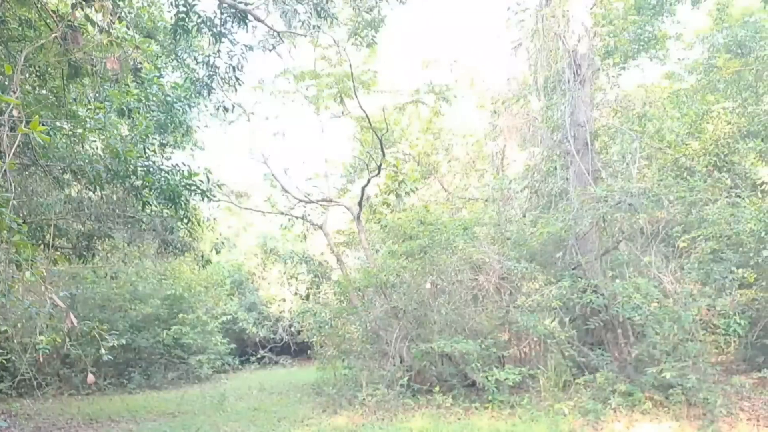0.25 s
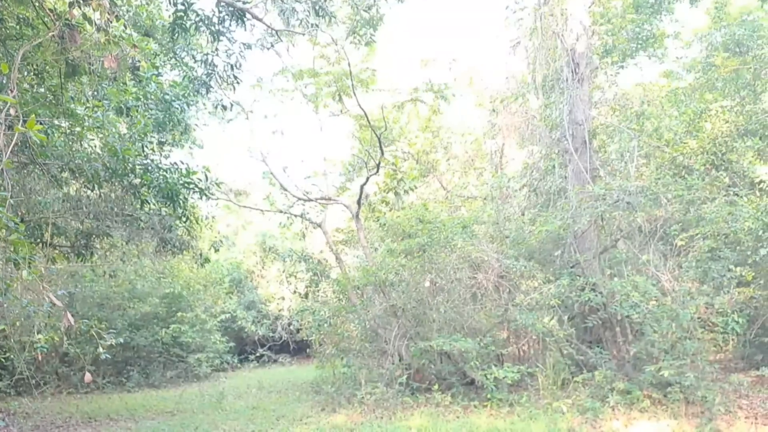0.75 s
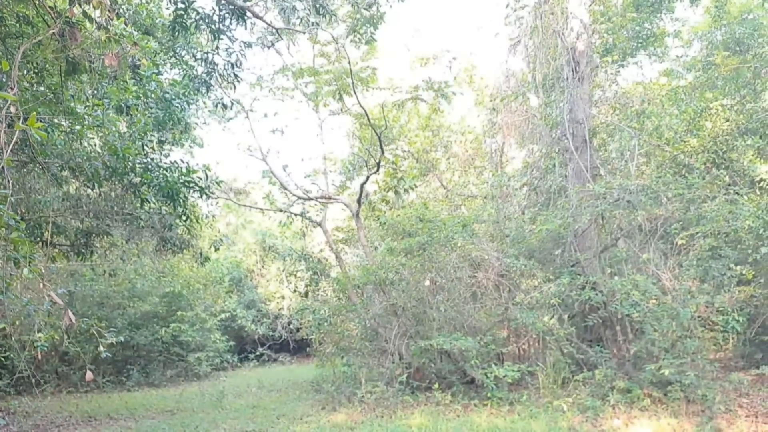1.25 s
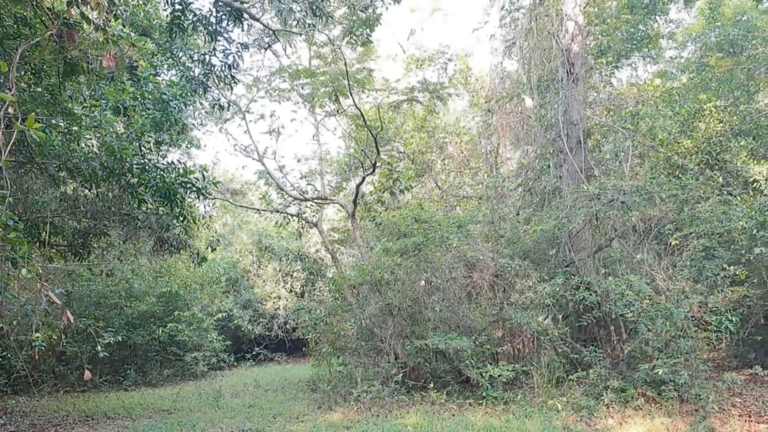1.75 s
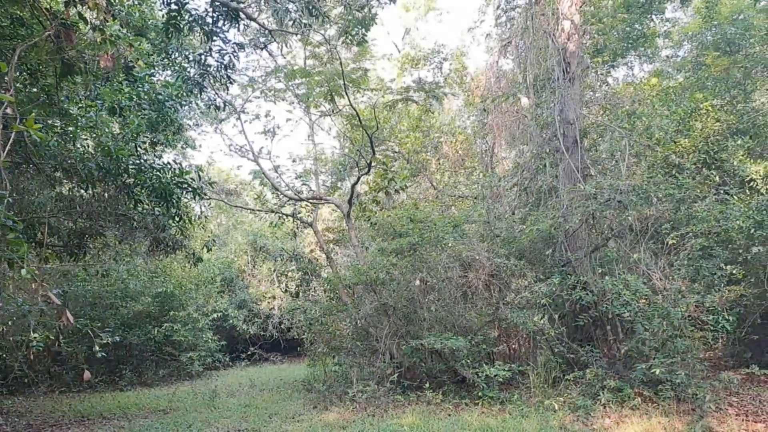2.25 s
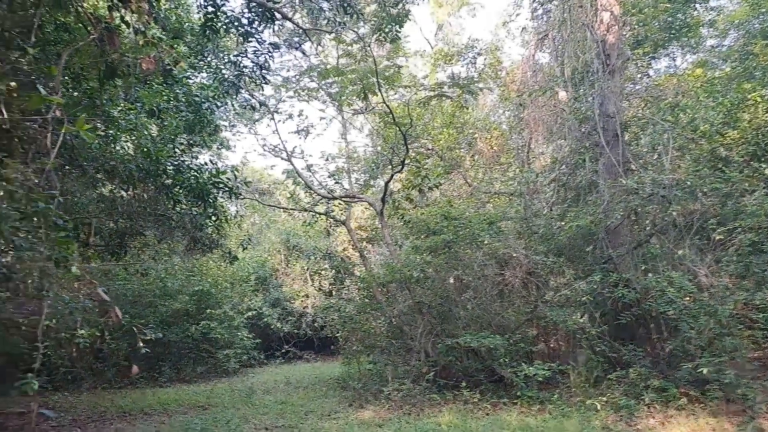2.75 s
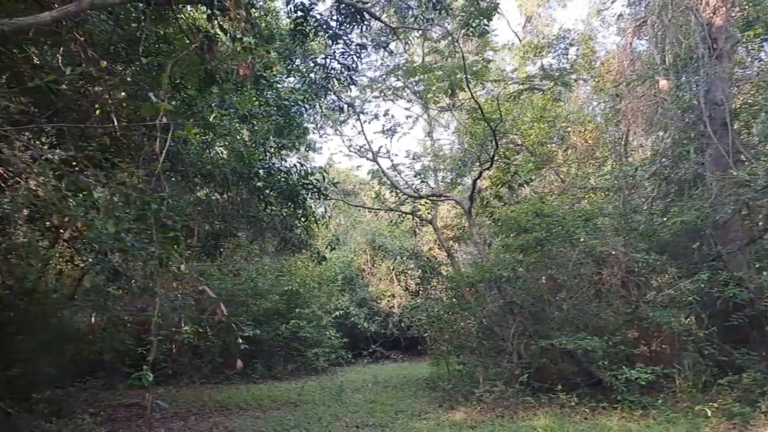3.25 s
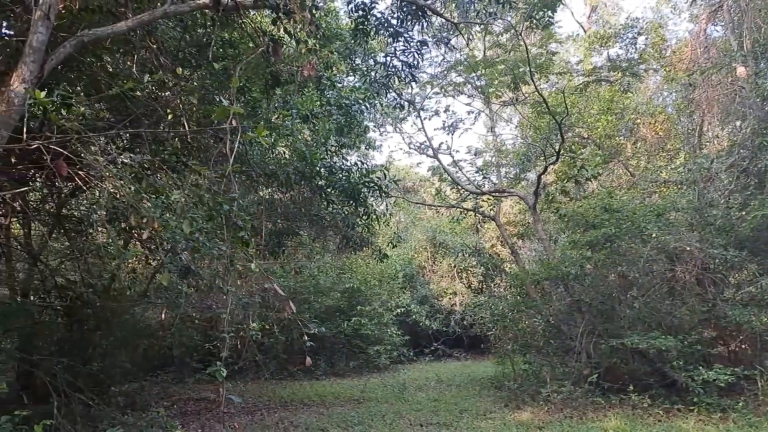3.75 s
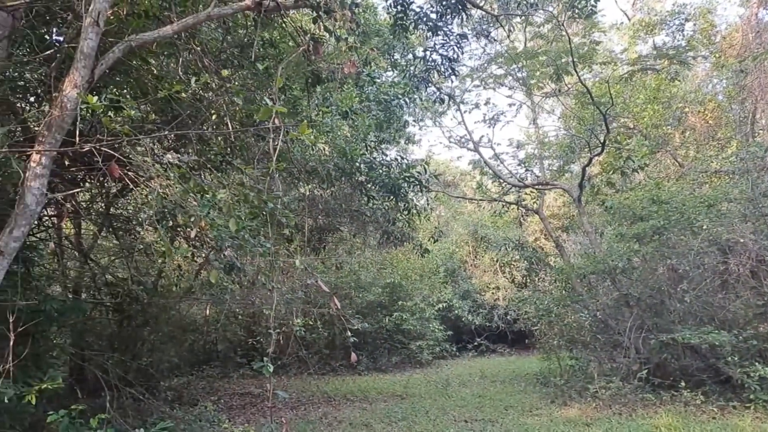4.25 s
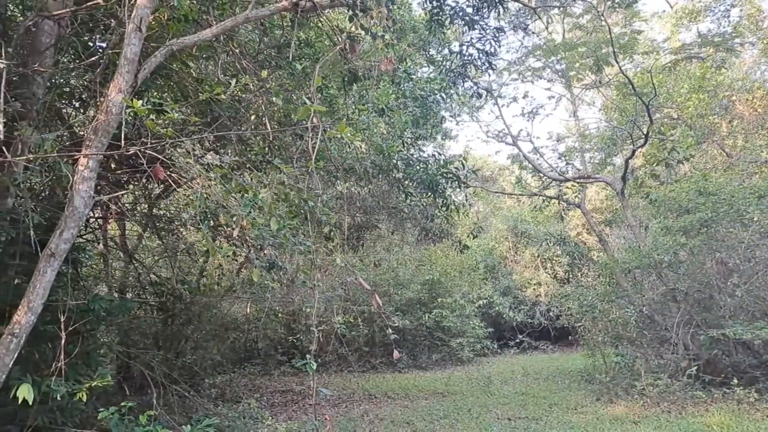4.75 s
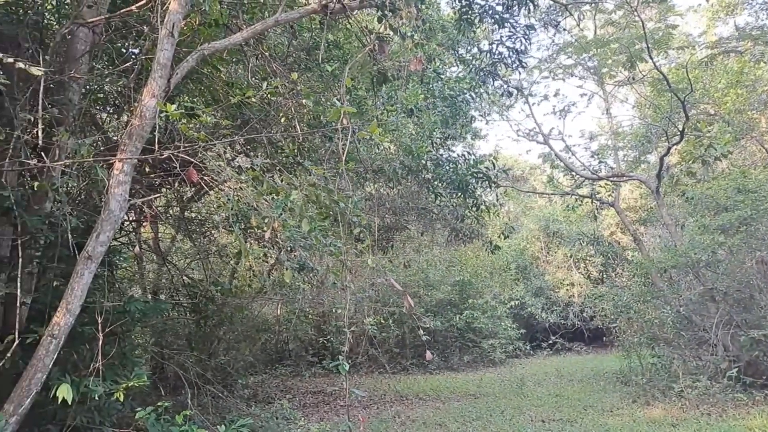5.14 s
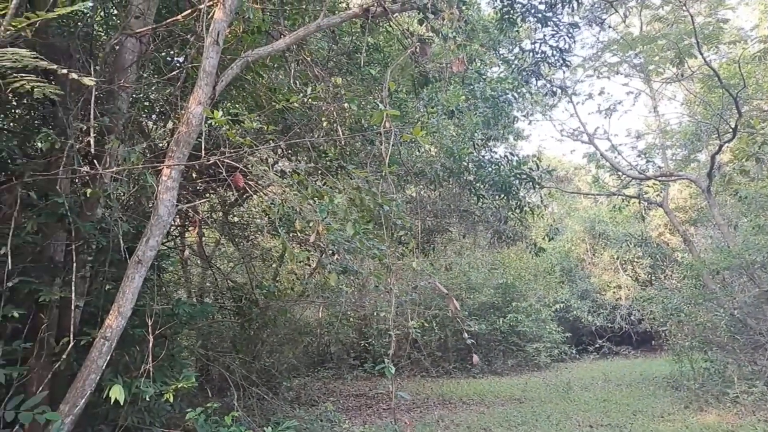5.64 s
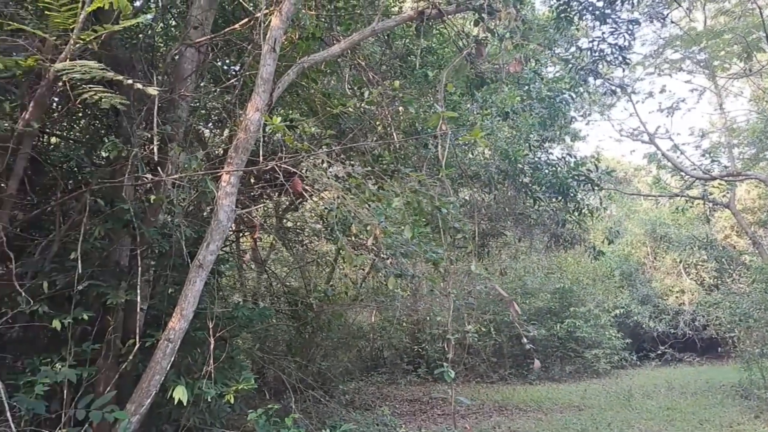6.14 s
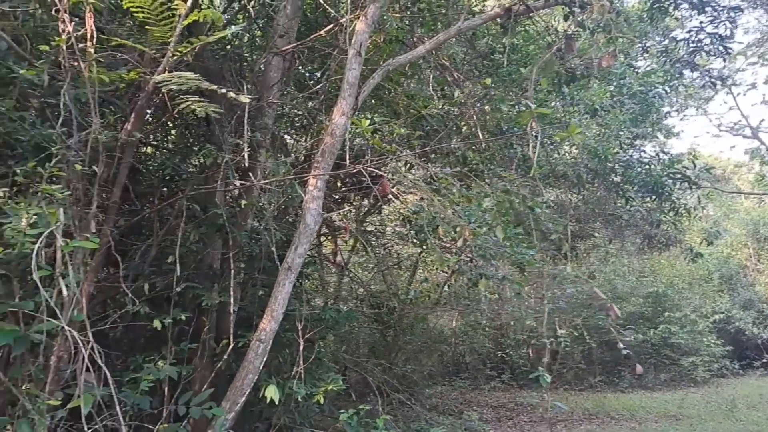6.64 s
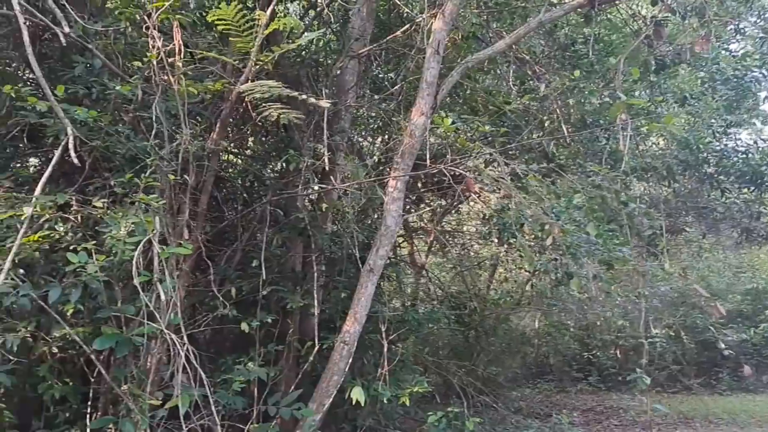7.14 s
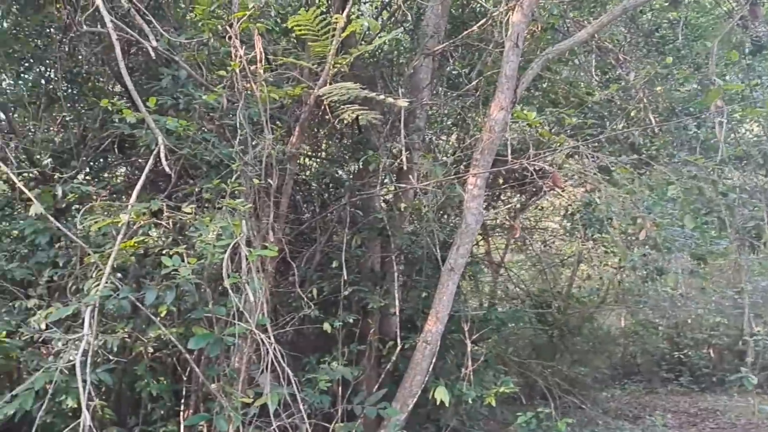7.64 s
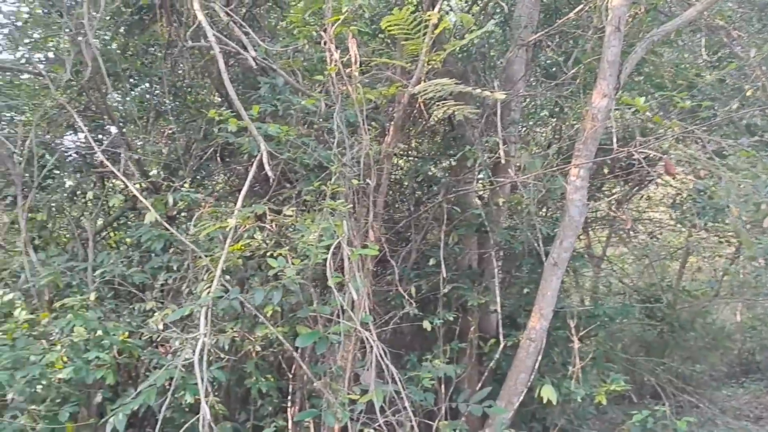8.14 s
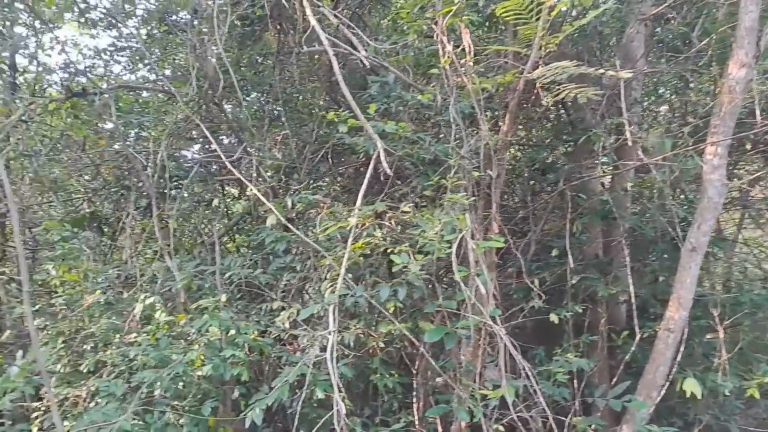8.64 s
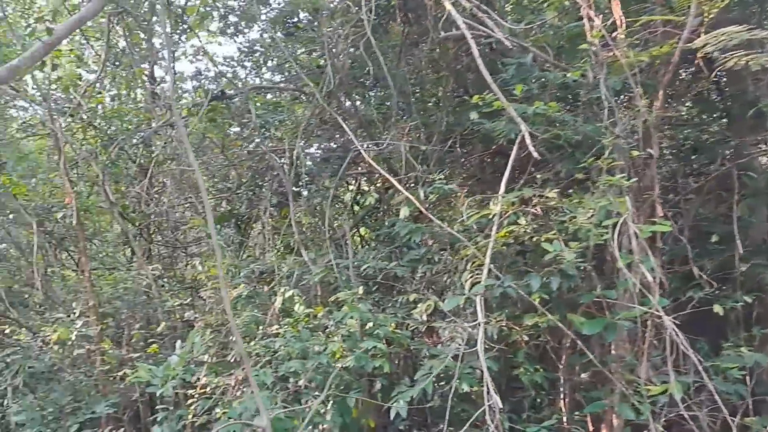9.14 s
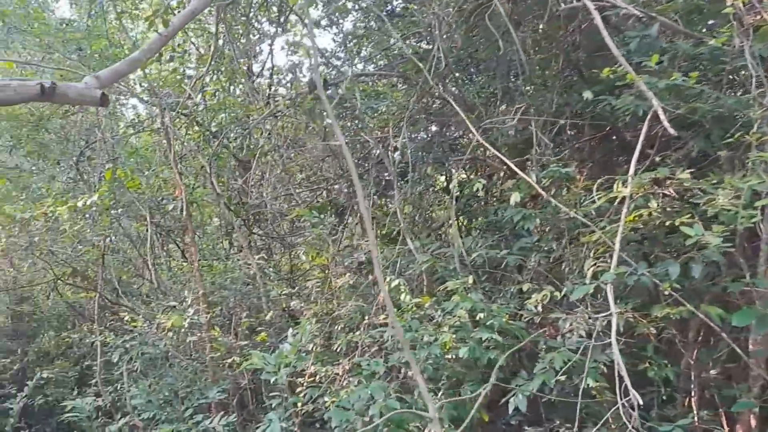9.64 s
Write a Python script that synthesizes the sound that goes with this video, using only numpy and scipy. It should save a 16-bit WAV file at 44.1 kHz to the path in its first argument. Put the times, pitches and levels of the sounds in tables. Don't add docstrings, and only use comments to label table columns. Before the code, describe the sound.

In a forest clearing, a wren sings bunches of quick four-note phrases, mostly in the first four seconds and again near six. Sharp high chips, faint trills and slurs answer around it, and a hoarse crow caws far off. Thin, steady insect ringing and low road rumble lie underneath. Leaves rustle lightly, then a loud twig snap and heavier steps come close to the stereo microphones after eight seconds.

```python
import sys
import numpy as np
from scipy import signal
from scipy.fft import rfft, irfft, next_fast_len
from scipy.io import wavfile
from scipy.ndimage import uniform_filter1d

SR = 44100
rng = np.random.default_rng(int(sys.argv[2]) if len(sys.argv) > 2 else 0)


def store_wav(level_fs):
    pcm = np.round(np.clip(np.atleast_2d(level_fs), -1, 1) * 32767)
    wavfile.write(sys.argv[1], SR, pcm.T.astype(np.int16))


def decibels_to_gain(level_db):
    exponent = np.asarray(level_db, float) / 20
    return 10 ** exponent


N = 436149
T = np.arange(N) / SR
SIZE = next_fast_len(N + SR)
HZ = np.arange(SIZE // 2 + 1) * SR / SIZE + 1e-3


def unit(x):
    return x / np.sqrt(np.mean(x ** 2))


def on_log(hz, table):
    f, v = np.transpose(table)
    return np.interp(np.log(hz), np.log(f), v)


def tint(x, gain):
    return irfft(rfft(x, SIZE) * gain, SIZE)[..., :N]


def bell(hz, octaves):
    return np.exp(-.5 * (np.log2(HZ / hz) / octaves) ** 2)


def walk(rate_hz):
    k = int(SR / rate_hz)
    held = np.repeat(rng.standard_normal(N // k + 1), k)
    return unit(uniform_filter1d(uniform_filter1d(held, k), k)[:N])


def sides(pan_db):
    return decibels_to_gain(np.array([[pan_db], [-pan_db]]) / 2)


def bouts(start_s, length_s, db, rest_db, rise_s, fall_s):
    coarse_t = T[::64]
    t = coarse_t - np.reshape(start_s, (-1, 1))
    overtime = np.maximum(t - np.reshape(length_s, (-1, 1)), 0)
    shape = np.exp(np.minimum(t, 0) / rise_s - overtime / fall_s)
    power = np.sum((decibels_to_gain(np.reshape(db, (-1, 1))) * shape) ** 2, axis=0)
    return np.interp(T, coarse_t, np.sqrt(decibels_to_gain(rest_db) ** 2 + power))


def arrive(lag_ms):
    return np.exp(-1j * np.pi * HZ * lag_ms / 1000 * np.array([[1], [-1]]))


def woods(x, direct_db, wet_db, t60_s, lag_ms):
    t = T[:SR]
    echo = rng.standard_normal((2, SR)) * decibels_to_gain(2.6 * rng.standard_normal((2, SR)))
    echo = echo * decibels_to_gain(-60 * t / t60_s) * np.clip(t / 0.012, 0, 1)
    echo = echo / np.sqrt(np.sum(echo ** 2, axis=1, keepdims=True))
    return tint(x, decibels_to_gain(direct_db) * arrive(lag_ms) + decibels_to_gain(wet_db) * rfft(echo, SIZE))


def whistle(out, rows, pan_db=0.):
    s, hz, db = np.transpose(rows)
    a, b = np.clip((s[[0, -1]] * SR).astype(int), 0, N)
    t = T[a:b]
    edge = np.clip(np.minimum(t - s[0], s[-1] - t) / 0.00044, 0, 1)
    phase = 2 * np.pi * np.cumsum(np.interp(t, s, hz)) / SR
    out[:, a:b] += sides(pan_db) * edge * decibels_to_gain(np.interp(t, s, db)) * np.sin(phase)


def falls(events, span, length_s):
    out = np.zeros((2, N))
    for s, db, hz, *pan_db in events:
        rows = [(s - .002, hz * (1 + span), db - 4.0),
                (s + 0.41 * length_s, hz * (1 + 0.11 * span), db),
                (s + length_s, hz * (1 - 0.6 * span), db - 8.5)]
        whistle(out, rows, *pan_db)
    return out


def air():
    # (frequency [Hz], level [dB per Hz])
    spectrum = [(20, -57), (38, -4), (56, 2.5), (85, 0), (146, -9), (350, -31), (900, -45.5), (1760, -43.5),
                (3400, -63), (4800, -40), (6500, -28), (9200, -43.5), (10700, -35), (16000, -61)]
    # (frequency [Hz], correlation [-1..1])
    likeness = [(60, 0.96), (130, 0.95), (290, 0.68), (640, 0.25), (1410, -0.26), (3100, 0.38),
                (6820, -0.084), (15000, -0.014)]
    # (time [s], level [dB])
    road = [(0.0, -29.5), (1.21, -28.5), (3.14, -31.5), (6.36, -30), (7.3, -32), (8.3, -30.5),
            (9.89, -30.5)]
    swell_db = walk(0.993)
    road_db = np.interp(T, *np.transpose(road)) + 30.5
    alike = np.clip(on_log(HZ, likeness), -.9, .99)
    noise = rfft(rng.standard_normal((2, SIZE))) * decibels_to_gain(on_log(HZ, spectrum))
    mid, side = noise * np.sqrt([1 + alike, 1 - alike])
    out = 0
    for hz in 28 * 2 ** np.arange(0, 9.6, .5):
        band = irfft(np.array([mid + side, mid - side]) * bell(hz, 0.38), SIZE)[:, :N]
        common_db = road_db if hz < 220 else swell_db
        out = out + band * decibels_to_gain(common_db + 1.64 * walk(6))
    return unit(out) * decibels_to_gain(-29.5)


def insects():
    # (pitch [Hz], band width [octaves], nearest singer's width [octaves], wing-stroke or
    # pulse rate [Hz], stroke sharpness, left minus right [dB])
    choirs = [
        (8165, 0.042, .002, 90.5, 2.0, 3.5),
        (7605, 0.03, .003, 76, 1.5, 1),
        (7110, 0.03, .02, 33, 0.64, 15),
        (11410, 0.04, .035, 230, 0.64, -3.5),
        (6150, 0.085, .06, 64, 1.0, 6.5),
    ]
    # (time [s], first level [dB], second level [dB], third level [dB])
    drone = [(0.0, -39, -41, -50.5), (3.0, -39, -42, -52.5), (5.6, -37.5, -41, -53),
             (6.55, -38, -39.5, -45.5), (7.4, -37.5, -43, -52.5), (8.84, -39.5, -40.5, -50),
             (9.89, -37, -38.5, -45)]
    # (start [s], length [s], level [dB])
    cricket = [(.15, 0.61, -50), (1.1, .55, -50.5), (1.85, 1.2, -51.5), (3.4, 0.38, -50), (4.15, 0.42, -53),
               (4.96, 0.44, -47.5), (5.75, .4, -51), (6.4, 0.56, -50), (7.967, 1.17, -47), (9.6, .4, -54)]
    # (time [s], peak level [dB])
    faint_chips = [(.02, -45), (.3, -43), (.45, -41.5), (.59, -40), (.84, -45), (1.131, -47), (1.3, -41),
                   (1.43, -50), (1.668, -39.5), (2.24, -41), (2.64, -41), (2.961, -45), (3.25, -43), (3.65, -41),
                   (3.98, -43), (4.2, -41), (4.69, -49), (4.85, -43), (5.12, -39.5), (5.4, -48), (5.7, -48),
                   (6.0, -43), (6.2, -39), (6.69, -41), (6.97, -40.5), (7.2, -43), (7.79, -48), (8.1, -42),
                   (8.75, -40.5), (9.14, -47)]
    s, *columns = np.transpose(drone)
    gains = [decibels_to_gain(np.interp(T, s, db)) for db in columns]
    gains.append(bouts(*np.transpose(cricket), rest_db=-62, rise_s=.12, fall_s=.07))
    chip_s, chip_db = np.transpose(faint_chips)
    gains.append(bouts(chip_s, .05, chip_db, rest_db=-50, rise_s=.012, fall_s=.06))
    out = 0
    for (hz, octaves, pure, stroke_hz, sharp, pan_db), gain in zip(choirs, gains):
        phase = 2 * np.pi * np.cumsum(stroke_hz * (1 + 0.0102 * walk(2))) / SR
        strokes = np.exp(sharp * (0.5 * np.cos(phase) + 0.62 * np.cos(phase / 2)))
        bands = np.array([bell(hz, pure), bell(hz, octaves), bell(hz, octaves)])
        near, *far = map(unit, tint(rng.standard_normal((3, N)), bands))
        choir = woods(unit(strokes * near), -1.6, 1, 0.38, -0.4745) + 1.35 * np.array(far)
        out = out + sides(pan_db) * gain * unit(choir)
    return out


def crow():
    # (start [s], length [s], highest pitch [Hz], sag [Hz per s], level [dB])
    caws = [
        (-.32, 0.46, 284, 141.4, -32),
        (0.664, 0.58, 286.8, 150.3, -30),
        (8.766, 0.49, 332.6, 25.1, -40.5),
    ]
    # (frequency [Hz], level [dB])
    beak = [(500, -34), (850, -15), (1150, -8), (1500, 11.5), (1800, 4.5), (2100, 5.5), (2350, -8.5),
            (2700, -15), (3500, -54)]
    rise_s, rise_hz, attack_s, release_s = .17, 59.9, 0.054, 0.068
    push_peak_db, push_s = 4, 0.072
    out, shake = np.zeros(N), walk(120)
    rasp = unit(tint(rng.standard_normal(N), decibels_to_gain(on_log(HZ, beak))))
    for s, length, top_hz, sag, db in caws:
        a, b = int(max(s, 0) * SR), int((s + length + 3 * release_s) * SR)
        t = T[a:b] - s
        before = np.maximum(rise_s - t, 0) / rise_s
        after_s = np.maximum(t - rise_s, 0)
        hz = top_hz - rise_hz * before ** 2 - sag * after_s
        hoarse = .01 + .008 * (-28.0 - db) + .45 * before ** 2 + .42 * after_s
        push_db = push_peak_db * np.exp(-((before * rise_s + after_s) / push_s) ** 2)
        release = np.exp(-(np.maximum(t - length, 0) / release_s) ** 2)
        gain = decibels_to_gain(db + push_db) * np.clip(t / attack_s, 0, 1) * release
        phase = 2 * np.pi * np.cumsum(hz * (1 + .08 * hoarse * shake[a:b])) / SR
        voice = unit(sum(decibels_to_gain(on_log(k * hz, beak)) * np.cos(k * phase + k * k) for k in range(2, 12)))
        share = np.clip(1.5 * hoarse, 0, .9)
        out[a:b] = (np.sqrt(1 - share) * voice + np.sqrt(share) * rasp[a:b]) * gain
    return woods(out, -1.0, -2.0, 0.51, -0.34)


def wren():
    # (onset [s], peak level [dB], long note over short ones [dB], left minus right [dB],
    # direct sound as the bird turns [dB])
    phrases = [(0.109, -19, -6.5, -2.5, 0), (0.384, -19.5, -7, -1, -0.5), (0.686, -18, -8, -2, -0.5),
               (1.654, -16.5, -8, -2, -3.5), (1.9272, -19.5, -7, 0.5, -2), (2.2112, -19.5, -6, 0.5, -1),
               (3.309, -22, -4.5, -2.5, -1), (3.5857, -17.5, -9.5, -0.5, -3), (3.878, -19, -8, -2, -1.5),
               (5.7365, -20.5, -3.5, -4, -10.5), (6.0108, -19, -5, -1, -6)]
    earlier = (-.165, -22, -3, -2, -2)
    # (time after onset [s], pitch [Hz], level [dB])
    notes = [
        [(-.004, 3560, -4), (.002, 3132, -0.5), (.008, 2830, -7.5), (.014, 2730, -21)],
        [(.037, 2205, -31), (.043, 2842, -2.5), (.047, 3188, 1), (.052, 3102, -4), (.057, 2730, -7)],
        [(.080, 2160, -16), (.086, 2845, -5), (.091, 3180, -6.5), (.096, 3123, 3), (.102, 3150, -50)],
        [(.122, 2060, -12.5), (.128, 2950, 2.5), (.136, 3510, 6), (.144, 3900, 8), (.156, 4140, 3),
         (.185, 4073, -5.5), (.24, 4047, -14)],
    ]
    lead = SR // 5
    out, direct = np.zeros((2, 2, N))
    chance = rng.standard_normal((len(phrases) + 1, 2, 4))
    for (s, db, top_db, pan_db, facing_db), (detune, effort) in zip([earlier, *phrases], chance):
        for k, note in enumerate(notes):
            note_db = db + top_db * (k == 3) + 0.34 * effort[k]
            rows = np.array(note) * [1, 1 + 0.00606 * detune[k], 1] + [s + lead / SR, 0, note_db]
            whistle(out, rows, pan_db)
            whistle(direct, rows + [0, 0, facing_db], pan_db)
    flutter = 1 + .2 * walk(150)
    echoes = woods(out * flutter, direct_db=-99, wet_db=-2.5, t60_s=0.54, lag_ms=0)
    heard = echoes + tint(direct * flutter, arrive(-0.371))
    return np.pad(heard[:, lead:], ((0, 0), (0, lead)))


def feet():
    # (start [s], length [s], leaf crackle [dB], ground scuff [dB])
    steps = [(0.0, 0.035, -47.5, -60), (.4, 0.043, -56, -61), (0.808, 0.33, -52, -58.5),
             (1.22, 0.04, -45, -57), (1.587, 0.068, -45, -53), (2.08, 0.017, -48.5, -68),
             (2.418, 0.071, -48, -54.5), (3.11, 0.066, -55, -63), (3.314, 0.05, -50, -52.5),
             (3.55, 0.041, -44, -54.5), (4.02, 0.024, -54, -58), (4.432, 0.11, -44, -59),
             (4.858, 0.035, -64, -53), (5.03, 0.12, -52, -58), (5.307, 0.066, -50, -50.5),
             (5.994, .08, -51, -65), (6.197, 0.11, -58, -51), (7.014, 0.076, -49.5, -55.5),
             (7.336, 0.16, -55.5, -54), (7.656, .03, -56.5, -63), (8.067, 0.19, -42.5, -50),
             (8.347, 0.09, -48.5, -60), (8.48, 0.03, -36, -45.5), (8.656, 0.48, -50.5, -55.5),
             (9.247, 0.36, -51.5, -77), (9.64, 0.044, -48.5, -52), (9.742, 0.054, -42, -41.5),
             (9.853, 0.045, -43.5, -48)]
    # (frequency [Hz], level [dB per Hz])
    leaf_spectrum = [(530, -24), (900, -4.5), (1590, -9.5), (2220, 0.5), (3730, 3), (5550, 7), (8550, 0),
                     (15100, 2), (16000, 1)]
    # (time [s], peak level [dB], left minus right [dB])
    twigs = [(1.2395, -26, 9), (1.5886, -32, 5), (2.0795, -27, 11), (5.1185, -25, 9), (5.388, -22, 8),
             (6.2517, -29, 7), (7.02, -29, 8), (7.3003, -22, 10), (8.051, -22, -3), (8.1189, -19, -8),
             (8.424, -20, -3), (8.472, -6.5, 11), (8.495, -9, 4), (8.451, -25, 0), (8.51, -21, 1),
             (8.525, -19, 3), (8.603, -25, -10), (8.637, -23, -12), (8.652, -35, -5), (8.668, -29, -8),
             (8.74, -18, 4), (8.999, -26, 15), (9.6328, -20, 5), (9.722, -26, 0), (9.7335, -10.5, 2.0),
             (9.825, -15, 4)]
    # (time [s], peak level [dB], ring [Hz])
    heels = [(1.62, -48, 520), (3.326, -41, 714), (4.858, -39, 616), (6.191, -39, 725), (6.232, -32.5, 640),
             (8.168, -33.5, 700), (8.472, -27.5, 740), (8.473, -21.5, 248), (9.631, -33.5, 447),
             (9.632, -29.5, 990), (9.644, -31, 636), (9.667, -30, 563), (9.735, -25, 483),
             (9.752, -38, 700), (9.769, -30, 665), (9.787, -26, 620), (9.800, -36, 750), (9.824, -39, 600),
             (9.840, -30, 644), (9.858, -36, 700)]
    rise_s, fall_s = 0.036, 0.059
    s, length, leaf_db, scuff_db = np.transpose(steps)
    sizes = np.minimum(rng.exponential(size=N // 40 + 1), 3.5).repeat(40)[:N]
    grains = rng.standard_normal((2, N)) * decibels_to_gain(3.1 * sizes)
    leaves = unit(tint(grains, decibels_to_gain(on_log(HZ, leaf_spectrum)))) * decibels_to_gain(11.0)
    leaves = leaves * bouts(s, length, leaf_db, -61, rise_s, fall_s)
    scuff = unit(tint(rng.standard_normal((2, N)), bell(495, 0.8))) * decibels_to_gain(2)
    scuff = scuff * bouts(s, length, scuff_db, -68, rise_s, fall_s)
    drag = unit(tint(grains, bell(1200, 0.42))) * bouts(8.11, 0.046, -35.5, -100, rise_s, fall_s)
    hits, thuds, t = np.zeros((2, N + 4000)), np.zeros(N + 4000), T[:4000]
    snap = np.exp(-t / 0.0012) + 0.2 * np.exp(-t / 0.028)
    for (s, db, pan_db), burst in zip(twigs, rng.standard_normal((len(twigs), 2, 4002))):
        woody_body = decibels_to_gain(-13) * uniform_filter1d(burst, size=7)[:, 2:] * 3
        crack = .5 * np.diff(burst, n=2) + woody_body
        a = int(s * SR)
        hits[:, a:a + 4000] += decibels_to_gain(db - 2.5) * sides(pan_db) * crack * snap
    thump = np.exp(-t / 0.0042) * (1 - np.exp(-t / 0.00016))
    for s, db, hz in heels:
        a = int(s * SR)
        thuds[a:a + 4000] += decibels_to_gain(db + 6.5) * np.sin(2 * np.pi * hz * t) * thump
    cracks = tint(hits[:, :N], HZ ** 2 / (HZ ** 2 + 900 ** 2))
    return leaves + scuff + drag + cracks + woods(thuds[:N], -1.4, -10, 0.17, 0.36)


def chipping_birds():
    # (time [s], peak level [dB], centre [Hz], left minus right [dB])
    chips = [(0.038, -21.5, 6070, 6), (0.5801, -28, 6330, 6), (0.82, -40, 6560, 18), (1.135, -33, 6200, 4),
             (1.675, -26, 6300, 8), (2.2, -30, 6300, 4), (7.975, -34, 6100, -6), (1.4391, -16, 6000, 6),
             (2.6424, -30, 6420, -2), (2.7806, -31, 5460, 12), (3.2236, -34, 5960, 9),
             (3.6356, -16, 6110, 1.0), (4.3899, -33, 6150, 11), (4.5211, -26, 6700, 11),
             (4.6813, -32, 6150, 1), (4.8923, -36, 5440, 12), (5.4136, -29, 6200, 6.5),
             (5.5922, -37, 6200, -5), (5.6426, -26, 6260, 1), (5.7279, -12.5, 6200, 0),
             (6.9476, -16.5, 5950, -5), (7.7797, -31, 6300, -8), (8.74, -29, 5980, -9),
             (9.1301, -14.5, 6050, -3)]
    return woods(falls(chips, 0.103, 0.0179), -5.0, -17.5, 0.94, -0.19)


def trilling_bird():
    # (time [s], peak level [dB])
    trill = [(.984, -29.5), (1.011, -31.5), (1.26, -30), (1.288, -26), (5.0474, -32.5), (5.08, -32),
             (5.107, -30), (5.327, -33), (5.351, -29), (5.381, -28.5), (5.408, -29), (5.596, -36),
             (5.6257, -31), (5.6522, -28), (5.68, -26), (5.707, -29), (5.8656, -30), (5.9453, -23.5),
             (5.974, -42), (6.103, -29), (6.129, -23.5)]
    pitch_hz = 4024 * (1 + 0.01 * rng.standard_normal(len(trill)))
    events = [(s, db, hz) for (s, db), hz in zip(trill, pitch_hz)]
    return woods(falls(events, 0.095, 0.0115), -0.29, -4.5, 0.4, 0.28)


def slurring_birds():
    # (lowest point [s], peak level [dB], lowest pitch [Hz], pitch where the fall starts [Hz], fall [s])
    slurs = [
        (1.297, -33, 2780, 3640, 0.096),
        (4.31, -33.5, 2920, 3590, 0.091),
        (4.862, -33.5, 2950, 3650, .10),
        (8.008, -36.5, 2870, 3540, .10),
        (9.797, -29.5, 2950, 3630, 0.082),
    ]
    # (start [s], length [s], pitch [Hz], level [dB])
    level_whistles = [
        (1.43, 0.016, 2650, -40),
        (2.581, 0.12, 2600, -47),
        (2.787, 0.051, 2300, -58),
        (2.728, 0.083, 5050, -43),
    ]
    # (time [s], pitch [Hz], level [dB])
    upward = [(3.235, 3290, -60), (3.27, 3380, -43), (3.3, 3980, -38)]
    buzz_s, buzz_hz, buzz_db, bend_s = .13, 3750, -4.5, .06
    clear, buzz = np.zeros((2, 2, N))
    whistle(clear, upward)
    along = np.linspace(0, 1, num=9)
    for s, db, end_hz, top_hz, length in slurs:
        start = s - length
        fall_hz = top_hz - (top_hz - end_hz) * along ** (length / bend_s)
        fall_db = db - 9 * (2 * along - 1) ** 4
        whistle(clear, np.transpose([start + length * along, fall_hz, fall_db]), -3)
        arch = [(start - buzz_s, 3540, db - 15),
                (start - 0.67 * buzz_s, buzz_hz - 100, db + buzz_db),
                (start - 0.233 * buzz_s, buzz_hz, db + buzz_db),
                (start + 0.0144, top_hz, db - 5)]
        whistle(buzz, arch, -3)
    for s, length, hz, db in level_whistles:
        end = s + length
        whistle(clear, [(s - .01, hz, db - 15), (s, hz, db), (end, hz, db), (end + 0.0081, hz, db - 10)])
    burr = walk(800)
    return woods(clear * (1 + .3 * burr) + buzz * burr, -3, 0.98, 1.0, -0.35)


def far_birds():
    # (time [s], peak level [dB], centre [Hz])
    chirps = [(1.41, -29.5, 4080), (4.48, -33, 2105), (4.93, -28, 4280), (4.96, -33, 5170),
              (6.54, -39.5, 3190), (6.6, -39.5, 3410), (4.59, -36, 2760)]
    return woods(falls(chirps, .17, .022), -9, 0, .55, .3)


def plunging_bird():
    # (time [s], peak level [dB], centre [Hz])
    plunges = [
        (7.304, -37.5, 3120),
        (7.576, -36, 3040),
    ]
    run = [(9.277 + k * .047, -40, 3850) for k in range(7)]
    return woods(falls([*plunges, *run], 0.222, 0.016), direct_db=-3, wet_db=-1, t60_s=.7, lag_ms=.33)


def scene():
    small_birds = chipping_birds() + trilling_bird() + slurring_birds() + far_birds() + plunging_bird()
    return air() + insects() + crow() + wren() + feet() + small_birds


def low_pass(x):
    return signal.sosfilt(signal.butter(12, 16500, fs=SR, output="sos"), x)


def record(dry):
    rounded = .75 * np.tanh(dry / .75)
    top_hz = 15850
    mix = tint(rounded, 1 / (1 + (HZ / top_hz) ** 300))
    return low_pass(mix)


dry = scene()
out = record(dry)
store_wav(out)
```